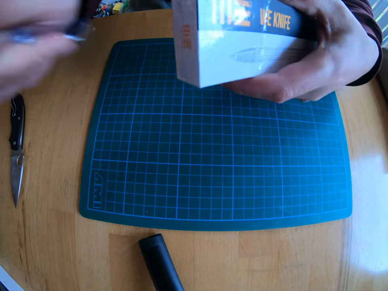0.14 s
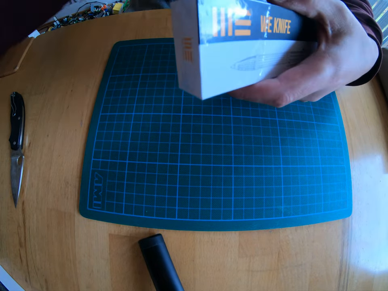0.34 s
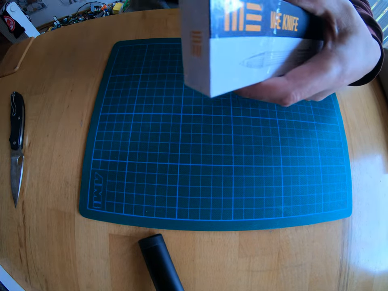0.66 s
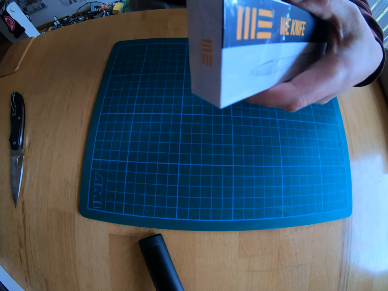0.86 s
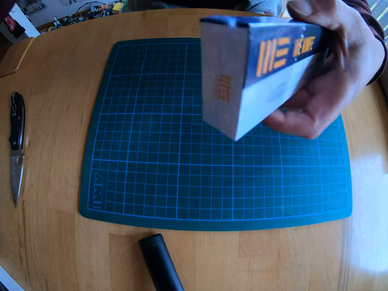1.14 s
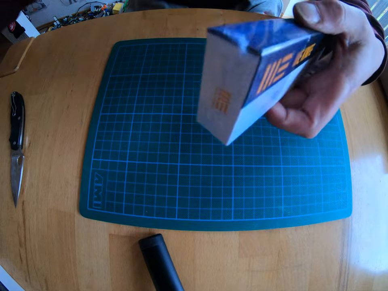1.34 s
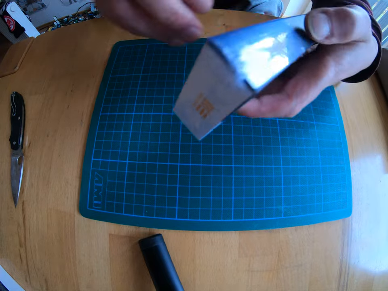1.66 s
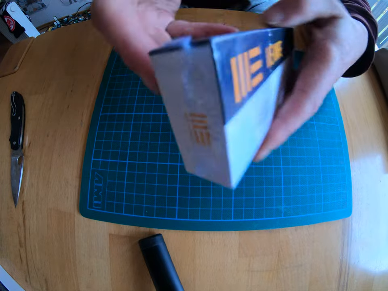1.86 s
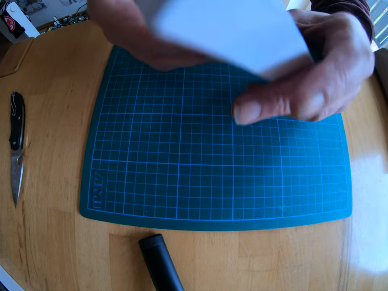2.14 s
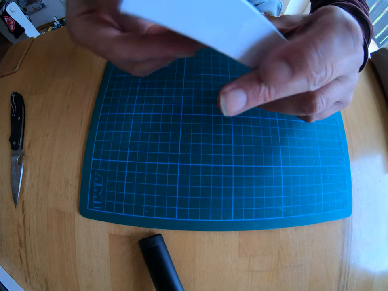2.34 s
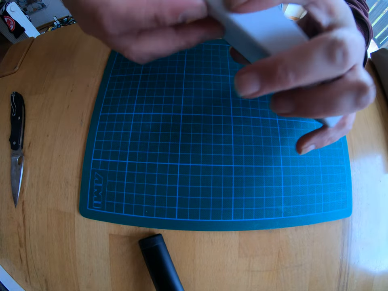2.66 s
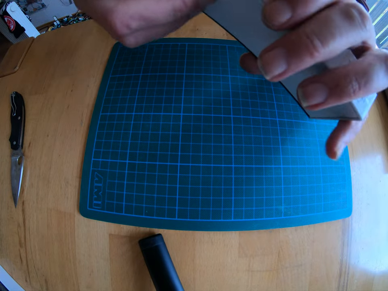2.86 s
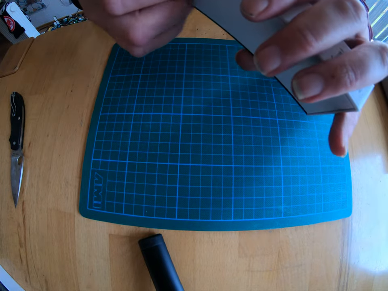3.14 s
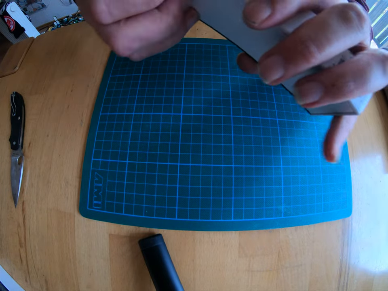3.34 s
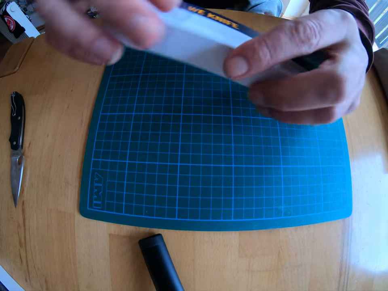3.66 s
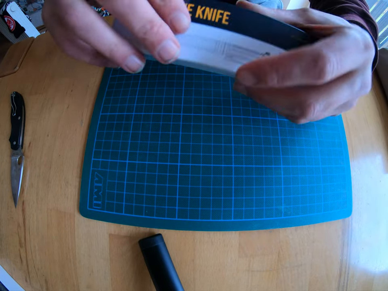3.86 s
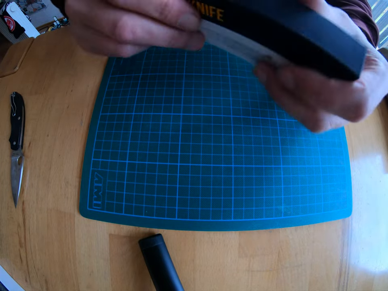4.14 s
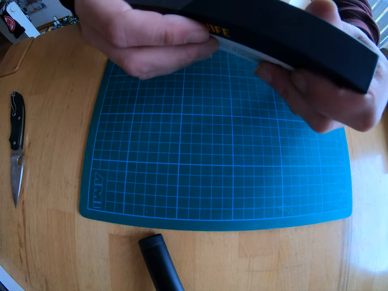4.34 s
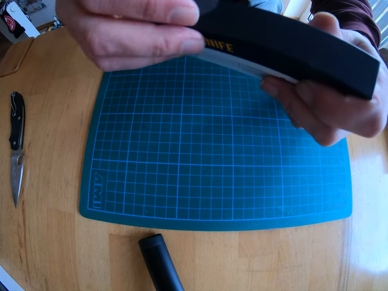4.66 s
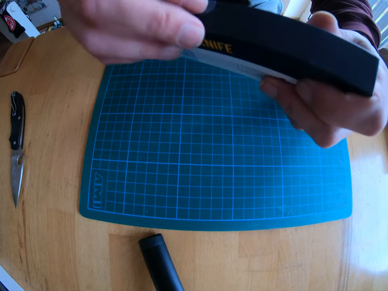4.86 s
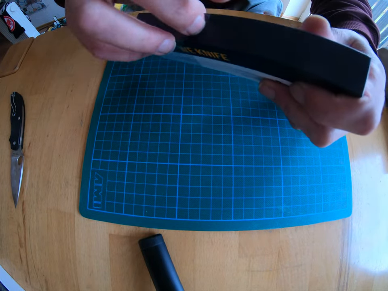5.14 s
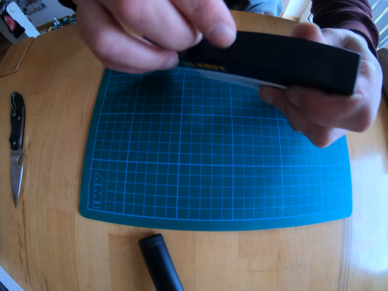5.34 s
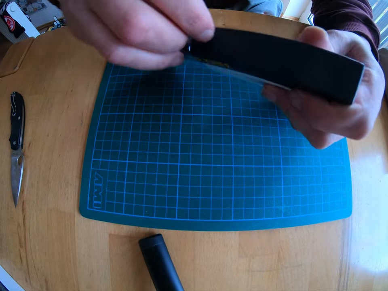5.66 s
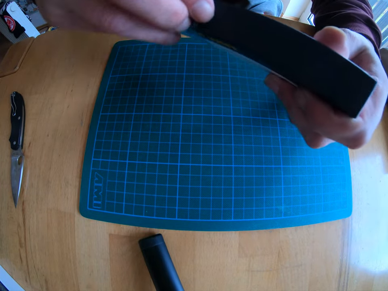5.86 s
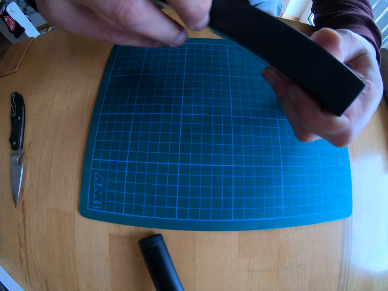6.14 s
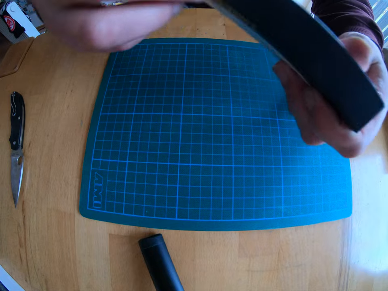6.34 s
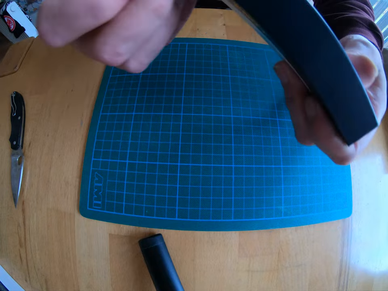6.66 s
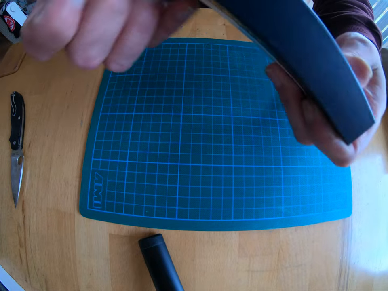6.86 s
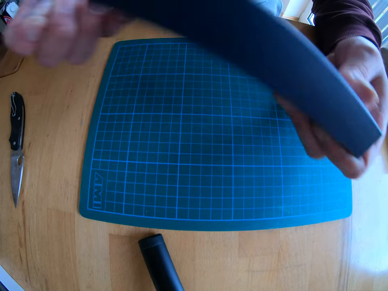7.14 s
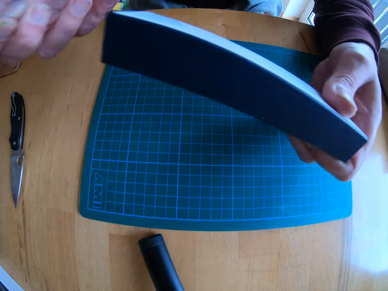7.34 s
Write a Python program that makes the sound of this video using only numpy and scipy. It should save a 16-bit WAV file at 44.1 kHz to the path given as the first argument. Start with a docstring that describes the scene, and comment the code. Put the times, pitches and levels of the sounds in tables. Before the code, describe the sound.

Loud plastic film crackles as it is pulled off a small cardboard box, then quiet finger rubbing, a bump, and snappy card scraping.

```python
"""Film crackles first: shrink wrap pulled off a cardboard box, close to a stereo camera in a small room.
Then fingers rub and turn the bare card, the box bumps the table, and its sleeve is worked loose
with sharp snaps and slides off with a scrape. Snaps are noise cracks with a brief panel ring; rubbing
and scraping are clouds of tiny slips shaped by the hand's effort; knocks and the room's low ring are
decaying tones. The room's reflections and a low murmur of its air lie behind."""
import sys
import numpy as np
from scipy import signal
from scipy.fft import rfft, irfft, next_fast_len
from scipy.io import wavfile
from scipy.ndimage import uniform_filter1d

SR = 44100
rng = np.random.default_rng(int(sys.argv[2]) if len(sys.argv) > 2 else 0)


def pcm_store(signal):
    """Save signal as 16-bit PCM."""
    levels = np.round(np.clip(np.atleast_2d(signal), -1, 1) * 32767)
    wavfile.write(sys.argv[1], SR, levels.astype(np.int16).T)


N = 331191

TOP_HZ = 16300  # upper limit of the camera's sound
REFERENCE_DB = -45  # middle-band level of a reference stroke, before the layer's gain

# Creases of film and card snapping, levels before the layer's gain: (time [s], middle-band level [dB],
# treble re middle [dB], panel pitch [Hz], left minus right [dB], limited in sides())
CREASE_SNAPS = [(0.0423, -31, -8.5, 4360, 10), (0.066, -25, -5.5, 2340, 1), (0.096, -34.5, -9, 2240, 8),
                (0.172, -36.5, -1, 2060, 15), (0.1855, -34, 2, 6100, 15), (0.216, -26.5, -15.5, 2260, 20),
                (0.307, -25.5, -7.5, 2130, 18), (0.335, -34, -2, 2030, 19), (0.383, -33, -9, 2740, 10),
                (0.4645, -36, 1.5, 3000, 14), (0.632, -43, 5, 2920, 0), (0.673, -41, 9, 5340, 1),
                (0.84, -48, 4, 3630, -7), (0.8635, -42, 4.5, 3580, -4), (0.7165, -37.5, 1.5, 3320, -1),
                (1.391, -41.5, -3.5, 2960, -5), (1.7469, -51.5, 4, 3170, -1), (2.0596, -47, -4.5, 2860, 2),
                (2.081, -49.5, -26, 1190, 0), (2.5745, -52, -14, 1290, 10), (3.45, -56, -30, 1710, 4),
                (2.1166, -41, -4, 3020, -12.5), (2.429, -46.5, -4.5, 7140, 4.5),
                (3.1553, -39.5, -27, 2180, 10), (3.9196, -51.5, 2, 3250, -1), (4.054, -47, -14, 2300, 2),
                (3.0665, -41.5, -22, 2030, 10), (3.177, -37, -32.5, 1880, 10), (4.468, -58.5, -1, 5100, 2),
                (4.538, -50.5, -0.5, 2440, 2.5), (5.4319, -34, -18, 1170, -0.5),
                (5.4575, -40.5, 2.5, 7800, 8.5), (5.5148, -29.5, 3, 2500, 1.5), (5.741, -37.5, -1, 3800, 3),
                (5.7509, -27, 2, 3140, -0.5), (5.817, -25, 3, 9400, 4), (6.003, -37.5, 5, 3740, 2),
                (6.095, -55.5, 21, 10600, 3), (6.125, -43, 16.5, 6400, 4.5), (6.317, -50, 14, 9200, 6.5),
                (6.3321, -40, 8, 8800, 0), (6.342, -43.5, 7, 2070, -2), (6.3819, -37, 11, 5530, -1),
                (6.3876, -38, 7, 6100, 19), (6.5062, -32, 5, 6070, 5), (6.526, -37, -13, 2170, 10),
                (6.55, -42, -20, 1750, 12), (6.5665, -29.5, 2, 4640, 3.5), (6.586, -44, -16, 2100, 6),
                (6.6026, -39, -14, 2170, 10), (6.6416, -31, 2, 5640, 7.5), (6.6489, -30, -7, 2200, 11),
                (6.6559, -24.5, -2.5, 1740, 4), (6.6691, -33.5, 2, 5230, 10), (6.715, -29.5, -4, 2230, 5),
                (6.7236, -36.5, -15, 1690, 15), (6.7302, -33.5, 1.5, 3260, 0), (6.749, -30, -3, 6400, 10.5),
                (6.7708, -24, -4.5, 3360, 0), (6.781, -25.5, -6, 2000, 10.5), (6.794, -36.5, -20, 1590, 11),
                (6.8338, -27.5, -4, 3330, 5), (6.8727, -38.5, -12, 1290, 6), (6.884, -42, 9.5, 6760, 1),
                (6.9149, -31, -1.5, 1810, 13), (6.9673, -34.5, -14, 6100, 20), (6.999, -35.5, -5, 2180, 13),
                (7.028, -34, 7, 8200, 5.5), (7.108, -34, 4.5, 2130, 3.5), (7.2039, -29.5, -2.5, 5660, 16),
                (7.317, -45.5, 2, 3500, 3), (7.409, -36.5, -5, 4430, 4.5)]
# Further modes of a snapping panel: (ratio to its pitch, level re main ring [dB])
PANEL_OVERTONES = [(0.582, -21), (1.52, -41), (2.2, -16.5)]
# Colour of a snap, before its bands are levelled: (frequency [Hz], gain [dB])
CREASE_COLOUR = [(200, -18), (600, -17.5), (1200, -7), (2200, 7), (6500, 4), (10000, 3), (11500, -21),
                 (14000, -10), (16500, -39.5)]
RING_SCATTER_DB = 3  # fingers damp each panel differently: spread of the ring lengths
# a dull snap has more body: body re middle [dB], and body lost per dB of treble
SNAP_BODY_DB, SNAP_THINNING = -17, 0.64


def snaps(crack_s, flutter_s, flutter_db, ring_db, ring_cycles, strain_s, strain_db, gain_db, size=1024):
    """A crease strains and flips: a crack, a brief panel ring, and flutter as the wave runs round the sheet."""
    lead = size // 8
    t = (np.arange(size) - lead) / SR
    after, since = t >= 0, np.abs(t)
    rows = np.array(CREASE_SNAPS)
    pitch_hz = rows[:, 3, None, None]

    noise = rng.standard_normal((len(rows), 3, size))  # one shared by both sides, one for each side
    crack = noise[:, :1] * after * np.exp(-since / crack_s)
    crack /= np.sqrt(np.sum(crack ** 2, axis=-1, keepdims=True))
    flutter_fall = undb(flutter_db) * np.exp(-since / flutter_s)
    strain_rise = undb(strain_db) * np.exp(-since / strain_s)
    flutter = np.where(after, flutter_fall, strain_rise) * (noise[:, :1] + noise[:, 1:])

    turns = pitch_hz * since
    cycles = ring_cycles * undb(RING_SCATTER_DB * rng.standard_normal((len(rows), 1, 1)))
    ring = 0
    for ratio, db in [(0.99, 0)] + PANEL_OVERTONES:
        audible = pitch_hz * ratio < TOP_HZ
        decay = np.exp(-ratio * turns / cycles)  # card is dead after a few cycles
        ring = ring + undb(db) * np.sin(2 * np.pi * ratio * turns) * decay * after * audible

    shapes = crack + flutter + undb(ring_db) * ring
    coloured = colour(shapes.reshape(-1, size), CREASE_COLOUR)
    bands = np.reshape(split(coloured), (3, -1, 2, size))
    out = np.zeros((2, N + size))
    for k, (s, db, treble_db, _, pan_db) in enumerate(rows):
        body_db = SNAP_BODY_DB - SNAP_THINNING * treble_db
        relative_db = (body_db, 0, treble_db)
        snap = sum(unit(band) * undb(db + rel + gain_db) for band, rel in zip(bands[:, k], relative_db))
        start = int(s * SR) - lead
        out[:, start:start + size] += snap * sides(pan_db)
    return out[:, :N]


# The free stretch of film or card between the fingers rings higher as it gets shorter and tauter:
# (time [s], resonance [Hz], strength before the layer's offset [dB])
FREE_SPAN = [(.1, 2200, 39), (.16, 2800, 26), (.22, 2190, 26), (.33, 2320, 22.5), (.52, 2560, 24.5),
             (.72, 3200, 15), (.9, 3330, -32), (1.76, 3070, 0), (2.1, 3000, -21), (2.8, 3240, 0),
             (3.1, 1940, -19), (4.06, 2400, -3.5), (4.13, 3900, -18), (4.25, 3100, 9), (4.42, 2920, 2),
             (5.5, 2600, -2), (5.8, 3450, 2), (6.52, 2200, 3.5), (6.92, 1930, -2), (7.2, 3180, -3)]


def rustle(levels, spectrum, rate, spread_db, ring_db, hiss_db, gain_db, pan_db, span_db,
           span_width_hz=650, rate_growth=0.092, apart=1.93, cycles=3.0, bunch_db=4, drift_db=1.5, count=18):
    """Countless slips and buckles of very unequal size; each facet has its own pitch and gives way in spurts."""
    heard = np.flatnonzero(levels[1] > -90)
    span = slice(heard[0], heard[-1])
    age = np.arange(512) / SR
    grains = np.zeros((2, N))[:, span]
    # a harder stroke slips more often
    rate = (rate * undb(rate_growth * (levels[1] - REFERENCE_DB)))[span]
    for hz in np.geomspace(600, 10000, count):
        noise = rng.standard_normal((3, len(age)))
        # quick spurts, and the grip moving over the facets
        strain_db = (bunch_db * walk(30) + drift_db * walk(4.2))[span]
        chance_size = np.minimum(rng.exponential(size=N)[span], 4.5)
        sizes = undb(spread_db * chance_size + strain_db)
        slips = (rng.random(N)[span] < rate / count / SR) * sizes
        crack = noise[0] * np.exp(-age / 0.0001)
        crack = crack + 0.53 * (noise[0] + apart * noise[1:]) * np.exp(-age / 0.0015)
        ring = np.sin(2 * np.pi * hz * age) * np.exp(-age * hz / cycles)
        grain = unit(crack) + undb(ring_db) * np.sqrt(hz / 3000) * unit(ring)
        grains += convolve(slips, grain)

    hiss = rng.standard_normal((3, N))[:, span]
    grains = unit(grains) + undb(hiss_db) * (hiss[0] + apart * hiss[1:])
    times, *columns = np.transpose(FREE_SPAN)
    span_hz, strength_db = (np.interp(np.arange(N)[span] / SR, times, column) for column in columns)
    grains = grains + undb(span_db + strength_db) * resonate(grains, span_hz, span_width_hz)

    out = np.zeros((2, N))
    for band, db, lean in zip(split(colour(grains, spectrum)), levels, (.5, 1, 0)):
        # the hand's effort sets how much energy the slips release over a few hundredths of a second
        power = uniform_filter1d(np.mean(band ** 2, axis=0), size=1800)
        level = undb(db[span] + gain_db)
        out[:, span] += band / np.sqrt(np.abs(power) + 1e-12) * level * sides(lean * pan_db)
    return out


def effort(strokes, attack_s, release_s, rest_db, body_db, body_growth):
    """Body, middle and treble levels [dB]: strokes swell, hold and die away over a faint resting contact."""
    t = np.arange(N) / SR
    touching = (t >= strokes[0][0]) & (t < strokes[-1][0] + strokes[-1][1] + .1)
    middle = treble = undb(rest_db) ** 2 * touching + 1e-14
    for s, hold_s, db, treble_db in strokes:
        swell = np.minimum(t - s, 0) / attack_s
        fall = np.maximum(t - s - hold_s, 0) / release_s
        shape = np.exp(swell - fall)
        middle = middle + (undb(db) * shape) ** 2
        treble = treble + (undb(db + treble_db) * shape) ** 2
    middle, treble = 10 * np.log10(middle), 10 * np.log10(treble)
    # body_db is the body of a reference stroke
    return body_db + body_growth * (middle - REFERENCE_DB), middle, treble


# Tugs that peel the film, weaker as it comes free, levels before the layer's gain:
# (full from [s], hold [s], middle-band level [dB], treble re middle [dB])
FILM_TUGS = [(0.0, 0.071, -30, -3.5), (.145, 0.04, -30.5, -3.5), (.198, 0.028, -29, -0.5),
             (.275, 0.064, -30.5, -1), (.35, 0.095, -34, -1.5), (.475, 0.08, -38.5, 1),
             (.53, 0.059, -35, 1), (.668, 0.003, -38, 1), (.71, 0.092, -46, 3), (.855, 0.028, -44, 6),
             (.928, 0.0094, -37, 2), (.98, 0.03, -44, 3), (1.04, 0.056, -46, -2), (1.165, 0.04, -50, 0),
             (1.205, 0.063, -54.5, 3.5)]
# Colour of the film, before its bands are levelled: (frequency [Hz], gain [dB])
FILM_COLOUR = [(59, -51.5), (100, -45), (160, -20.5), (308, -19), (854, -17), (1550, -9), (2080, 2.5),
               (2800, -0.5), (5770, -3.5), (6990, -0.5), (9610, -3), (11600, -19.5), (14400, -20),
               (16000, -48.5)]
# Taut film crackles coarsely, loose film slides off in a fine swish:
# (time [s], crinkles at the reference level [1/s])
CRINKLE_RATE = [(.62, 1300), (.95, 11000)]


def film_peeling():
    """Stiff film, tugged off close to the microphones, buckles in clusters."""
    levels = effort(FILM_TUGS, attack_s=0.021, release_s=0.04, rest_db=-76, body_db=-51, body_growth=0.82)
    return rustle(levels, FILM_COLOUR, rate=over_time(CRINKLE_RATE), spread_db=3.3, ring_db=-4.5,
                  hiss_db=-20, gain_db=1.3, pan_db=2.0, span_db=-1.5, bunch_db=3.2, drift_db=0.0)


# Pushes that scrape the sleeve along the box, levels before the layer's gain:
# (full from [s], hold [s], middle-band level [dB], treble re middle [dB])
SLEEVE_PUSHES = [(5.435, 0.027, -49.5, -19), (5.46, 0.014, -39, 2), (5.495, 0.01, -41.5, 6.5),
                 (6.128, 0.1, -54, 8.5), (6.322, 0.049, -46, -5), (6.48, 0.022, -49.5, -6),
                 (6.512, 0.039, -43.5, -16), (6.647, 0.033, -43.5, 0), (6.695, 0.036, -43, -2),
                 (6.772, 0.014, -39.5, 4.5), (6.83, 0.13, -49.5, 4.5), (6.935, 0.051, -36, 3),
                 (7.002, 0.028, -31.5, -1.5), (7.148, 0.02, -50.5, 14.5), (7.18, 0.013, -27, -1),
                 (7.203, 0.04, -27, -4.5), (7.31, 0.063, -49.5, -9), (7.413, 0.047, -43, -4.5)]
# Colour of the scraped card, before its bands are levelled: (frequency [Hz], gain [dB])
CARD_COLOUR = [(88, -28.5), (150, -11.5), (689, -18.5), (888, -14.5), (2100, -2.5), (2700, -5.5),
               (3290, -4.5), (6140, -0.5), (8070, 4), (9630, 1), (14200, -17.5), (16000, -31)]
# The sleeve skids smoothly at first, catches while it is worked loose, then slides:
# (time [s], slips at the reference level [1/s])
SLIP_RATE = [(5.52, 20000), (5.6, 450), (6.9, 450), (6.94, 1700)]


def sleeve_sliding():
    """Card scrapes on card in slips that grow somewhat denser with a harder push."""
    levels = effort(SLEEVE_PUSHES, attack_s=0.0091, release_s=0.023, rest_db=-64.0, body_db=-53.5,
                    body_growth=0.88)
    return rustle(levels, CARD_COLOUR, rate=over_time(SLIP_RATE), spread_db=4.0, ring_db=0,
                  hiss_db=-17.0, gain_db=-0.5, pan_db=4.5, span_db=2.5, rate_growth=0.35)


# Strokes of the fingers over the bare card, levels before the layer's gain:
# (full from [s], hold [s], middle-band level [dB], treble re middle [dB])
FINGER_RUBS = [(1.27, 0.097, -63, -19), (1.395, 0.024, -56, 2), (1.48, .13, -62.5, -4.5),
               (1.665, 0.018, -59.5, -6), (1.75, 0.025, -57.5, 1.5), (1.83, 0.083, -63.5, -5),
               (1.92, 0.053, -58.5, 0.5), (2.015, 0.05, -56.5, -6), (2.065, 0.0092, -54.5, -16),
               (2.12, 0.0066, -44.5, -6), (2.19, 0.083, -63, -4), (2.3, 0.16, -63, -6),
               (2.47, 0.16, -59, 0.5), (2.66, 0.058, -61, -10), (2.74, .16, -61.5, 4.5),
               (3.465, 0.067, -59.5, -4.5), (3.535, 0.034, -62.5, 6.5), (3.62, 0.28, -63.5, -9),
               (3.91, 0.1, -54.5, -5), (4.07, 0.092, -56.5, -3.5), (4.2, 0.087, -59.5, -3),
               (4.34, .075, -58, 0), (4.47, 0.16, -58.5, -0.5), (4.66, 0.078, -70.5, 0.5),
               (4.89, .07, -70, -4), (5.04, 0.08, -69, -4), (5.185, 0.039, -64, -4.5),
               (5.28, 0.0074, -64.5, -16), (5.41, .02, -59.5, -5.5), (5.665, 0.031, -52, 2.5),
               (5.76, 0.11, -52.5, 2.5), (5.895, 0.052, -56, 0)]
# Colour of skin on card, before its bands are levelled: (frequency [Hz], gain [dB])
SKIN_COLOUR = [(180, -58), (300, -18), (455, -1.5), (494, -9.5), (725, -13.5), (1100, -5), (1640, -8),
               (2360, -3), (3190, -7), (7440, -3.5), (8360, -10), (9550, -7), (11700, -25), (14500, -23),
               (16000, -58)]


def finger_rubbing():
    """Skin on card is smooth: its facets ring little and their balance drifts slightly."""
    levels = effort(FINGER_RUBS, attack_s=0.012, release_s=0.039, rest_db=-85.0, body_db=-59.5,
                    body_growth=1.0)
    return rustle(levels, SKIN_COLOUR, rate=6000, spread_db=3.0, ring_db=-4, hiss_db=-7.5,
                  gain_db=2.72, pan_db=0.5, span_db=3.5, bunch_db=3.0, drift_db=2)


# Squeezes of the hollow end of the box, levels before the layer's gain:
# (full from [s], hold [s], middle-band level [dB], treble re middle [dB])
BOX_GRIPS = [(2.95, 0.12, -57.5, -4.5), (3.05, 0.04, -47.5, -6), (3.144, 0.0091, -40.5, -12),
             (3.18, 0.012, -40.5, -14.5), (3.215, 0.157, -62, -5), (3.367, 0.023, -49.5, -17)]
# Colour of the hollow end, before its bands are levelled: (frequency [Hz], gain [dB])
HOLLOW_COLOUR = [(90, -40), (250, -10), (1000, -14.5), (1400, 6.5), (2200, 12), (3000, -2), (5300, -18),
                 (6600, -17.5), (10000, -29), (16000, -81)]


def box_gripping():
    """The hollow end gives under the hand in short squeezes."""
    levels = effort(BOX_GRIPS, attack_s=0.0032, release_s=0.0078, rest_db=-73.0, body_db=-52.0,
                    body_growth=1.0)
    return rustle(levels, HOLLOW_COLOUR, rate=4900, spread_db=-2.0, ring_db=-14.0, hiss_db=-7.0,
                  gain_db=3.5, pan_db=2.5, span_db=-5)


# Panels of the box under the fingers: (resonance [Hz], width [Hz], level [dB])
BOX_PANELS = [(792, 140, 3), (1318, 78, -1)]


def panels(x):
    """The box's panels ring along with whatever rubs them."""
    ringing = 0
    for hz, width_hz, db in BOX_PANELS:
        ringing = ringing + undb(db) * signal.lfilter(*signal.iirpeak(hz, hz / width_hz, fs=SR), x)
    return x + ringing


# Air in the sleeve, deeper as the inner box slides out: (time [s], resonance [Hz], level [dB])
SLEEVE_AIR = [(6.4, 1310, -22), (6.55, 970, 9), (6.72, 870, 2), (6.97, 820, 3), (7.03, 504, 8.5),
              (7.3, 460, -7)]


def cavity(x, width_hz):
    """The hollow of the sleeve answers what is heard with one falling resonance."""
    s, hz, db = np.transpose(SLEEVE_AIR)
    t = np.arange(N) / SR
    return resonate(x, np.interp(t, s, hz), width_hz) * undb(np.interp(t, s, db)) * (t > s[0])


# Soft knocks on the hollow box: (time [s], envelope peak [dB], pitch [Hz], swell [s])
BOX_KNOCKS = [(.543, -33.5, 616, 0.0011), (1.884, -53.5, 45.6, 0.027), (1.912, -49, 202, 0.0092),
              (1.948, -50.5, 223, 0.017), (2.061, -34, 70.6, 0.00089), (2.126, -34, 1060, 0.0012),
              (2.467, -45, 800, 0.00048), (4.182, -40, 1110, 0.00085), (3.156, -38, 364, 0.0019),
              (3.178, -40, 245, 0.0028), (5.4353, -28.5, 227, 0.0052), (5.817, -47.5, 135.4, 0.0021),
              (7.022, -35.5, 430, 0.001), (7.03, -48, 54.4, 0.0053), (7.247, -24.5, 159, 0.0025)]


def knocks():
    """The box and the air in it swing for a few cycles."""
    out, t = np.zeros(N), np.arange(8192) / SR
    for s, db, hz, swell_s in BOX_KNOCKS:
        envelope = undb(db) * t / swell_s * np.exp(1 - t / swell_s)
        swing = envelope * np.sin(2 * np.pi * hz * t)
        start = int(s * SR)
        out[start:start + len(t)] += swing[:N - start]
    return out


# Low modes of the room, set ringing by the bump:
# (frequency [Hz], level re BUMP_DB [dB], t60 [s], left leads by [rad])
ROOM_MODES = [(175, 7.5, 0.49, 2), (223, -8, 0.36, 0), (257, -2.5, 0.64, 0.1), (270, -9, 0.45, 0.29),
              (295.3, -7, 0.5, 0.55), (499, -7.5, 0.22, 0.66)]
BUMP_S, BUMP_DB = 5.433, -34.5


def bump(rumble_db, rumble_t60_s, low_hz, high_hz, rattle_db, rattle_t60_s, rattle_low_hz, rattle_high_hz):
    """The room rings low after the box bumps the table, with a dying rumble and a brief chatter of the box."""
    t = np.maximum(np.arange(N) / SR - BUMP_S, 0)
    half = np.array([[.5], [-.5]])
    ring = 0
    for hz, db, t60, lead in ROOM_MODES:
        ring = ring + undb(db - 60 * np.minimum(t / t60, 2)) * np.sin(2 * np.pi * hz * t + half * lead)
    rumble = rumble_db, rumble_t60_s, [low_hz, high_hz]
    rattle = rattle_db, rattle_t60_s, [rattle_low_hz, rattle_high_hz]
    shake = 0
    for db, t60, band in (rumble, rattle):
        sos = signal.butter(2, band, "band", fs=SR, output="sos")
        shudder = unit(signal.sosfilt(sos, rng.standard_normal(N)))
        shake = shake + shudder * undb(db - 60 * np.minimum(t / t60, 2))
    swell = 1 - np.exp(-t / 0.00062)
    return swell * (undb(BUMP_DB) * ring + shake)


# The camera's two ports: (frequency [Hz], left leads by [rad])
CAMERA_PORTS = [(120, 1), (260, -0.1), (520, -1.1), (1120, 1.5), (2100, -1.03), (4300, 0.33), (8700, 3.5),
                (16000, 10)]


def ports(x):
    """Near sound bends round the camera and reaches its two ports out of step."""
    size = next_fast_len(N + 2048, real=True)
    turn = np.exp(1j * np.array([[.5], [-.5]]) * along(CAMERA_PORTS, size))
    return irfft(rfft(x, size) * turn, size)[:, :N]


# Colour of the room's reflections: (frequency [Hz], gain [dB])
WALL_COLOUR = [(100, -1), (250, 2), (600, 4.5), (1500, 3.5), (3000, 1.5), (7000, -1), (9500, 3),
               (12000, -16.5), (16000, 19)]


def room(x, t60_s, wet_db, early_s, early_db):
    """Quick reflections from table and hands, then the diffuse tail of a small room."""
    t = np.arange(SR // 2) / SR
    noise = rng.standard_normal((2, 2, len(t))) * (t > .003)
    tail = unit(noise[0] * np.exp(-np.log(1000) * t / t60_s))
    early = unit(noise[1] * np.exp(-t / early_s))
    reflections = undb(wet_db) * tail + undb(early_db) * early
    response = colour(reflections, WALL_COLOUR) / np.sqrt(len(t))
    return convolve(x.mean(axis=0), response)


# Colour of the room's air, before it is levelled: (frequency [Hz], gain [dB])
HUSH_COLOUR = [(25, -1), (92, -16.5), (170, 6.5), (260, 0), (400, -12), (570, -9), (775, -1), (950, -9.5),
               (1350, -6.5), (2000, -17.5), (4500, -20), (9600, -39), (16000, -50.5)]
HUSH_DB = -65.5  # rms over both channels


def hush(apart):
    """Steady low murmur of the room's air and faint hiss."""
    air = rng.standard_normal(N) + apart * rng.standard_normal((2, N))
    return unit(colour(air, HUSH_COLOUR, size=8192)) * undb(HUSH_DB)


def undb(db):
    """Decibels to gain."""
    return 10 ** (np.asarray(db) / 20)


def unit(x):
    """Scale to rms 1."""
    return x / np.sqrt(np.mean(x ** 2) + 1e-20)


def sides(pan_db):
    """Left and right gains; the small camera shades one port only so far."""
    return undb(np.array([[.5], [-.5]]) * np.clip(pan_db, -10, 10))


def along(points, size):
    """A table over log frequency, read at the bins of a transform."""
    hz, value = np.transpose(points)
    bins_hz = np.arange(size // 2 + 1) * SR / size
    return np.interp(np.log(bins_hz + 1), np.log(hz + 1), value)


def over_time(points):
    """A table over time, read at every sample."""
    return np.interp(np.arange(N) / SR, *np.transpose(points))


def walk(rate):
    """Smooth random wander through `rate` knots a second, with an rms near 1.9."""
    knots = rng.standard_normal(4096)
    return 2.32 * np.interp(np.arange(N) / SR * rate, np.arange(len(knots)), knots)


def convolve(x, response):
    """Pass each channel through a response, keeping the length."""
    return signal.fftconvolve(np.atleast_2d(x), np.atleast_2d(response), axes=-1)[:, :x.shape[-1]]


def colour(x, points, size=2048):
    """Causal minimum-phase filter with the given spectrum, by way of the cepstrum."""
    cepstrum = irfft(np.log(undb(along(points, size))))
    cepstrum[1:size // 2] *= 2
    cepstrum[size // 2 + 1:] = 0
    return convolve(x, irfft(np.exp(rfft(cepstrum))))


# Body, middle and treble: (low edge [Hz], high edge [Hz])
BAND_EDGES = [(120, 1200), (1200, 4200), (4800, 17000)]


def split(x):
    """Body, middle and treble bands."""
    return [signal.sosfilt(signal.butter(3, band, "band", fs=SR, output="sos"), x) for band in BAND_EDGES]


def resonate(x, hz, width_hz):
    """One resonance whose centre moves, gain 1 at the centre."""
    swing = np.exp(2j * np.pi * np.cumsum(hz) / SR)
    keep = np.exp(-np.pi * width_hz / SR)
    return 2 * np.real(signal.lfilter([1 - keep], [1, -keep], x / swing) * swing)


def scene():
    """All the handling noises, near and by way of the room."""
    near = snaps(crack_s=0.000057, flutter_s=0.0015, flutter_db=1.0, ring_db=9, ring_cycles=2.3,
                 strain_s=0.00069, strain_db=-31.0, gain_db=-3.0)
    near += film_peeling()
    near += sleeve_sliding()
    near += panels(finger_rubbing() + box_gripping())
    near += cavity(near, width_hz=128) + knocks()
    bump_ring = bump(rumble_db=-33.5, rumble_t60_s=0.35, low_hz=123, high_hz=364,
                     rattle_db=-37.5, rattle_t60_s=0.11, rattle_low_hz=684, rattle_high_hz=1550)
    echo = room(near, t60_s=.42, wet_db=-15, early_s=.012, early_db=-14)
    return ports(near) + echo + bump_ring + hush(apart=3.7)


def record(dry):
    """The camera cuts the top with a steep low-pass."""
    return signal.sosfilt(signal.ellip(8, .2, 70, TOP_HZ, fs=SR, output="sos"), dry)


dry = scene()
out = record(dry)
pcm_store(out)
```